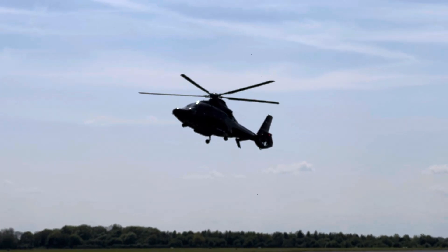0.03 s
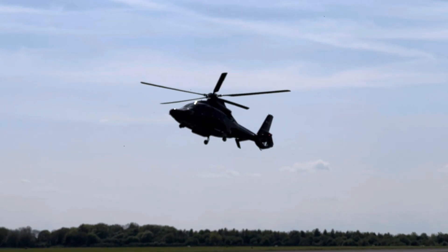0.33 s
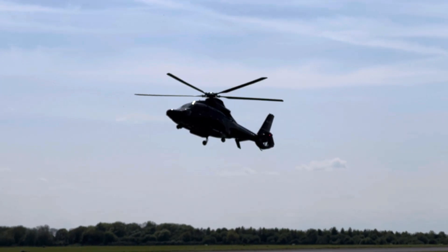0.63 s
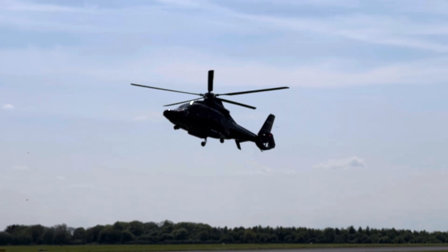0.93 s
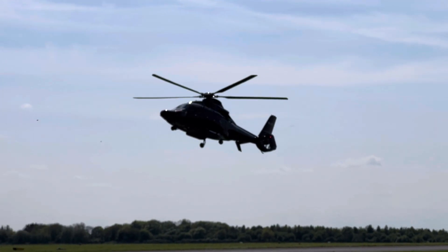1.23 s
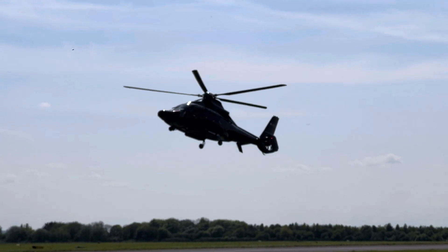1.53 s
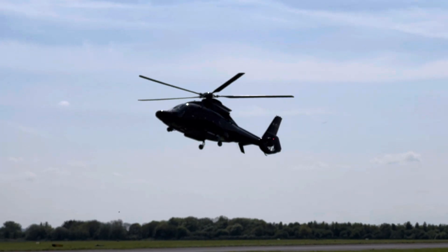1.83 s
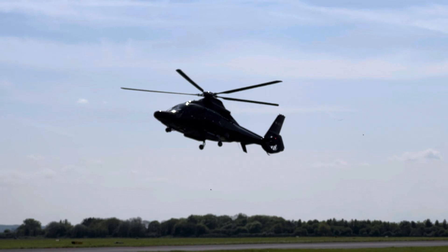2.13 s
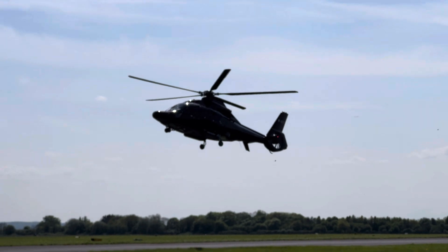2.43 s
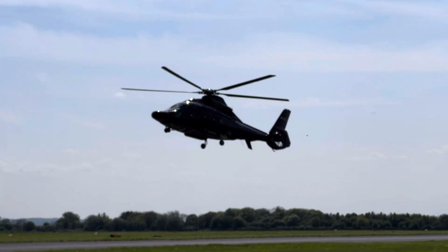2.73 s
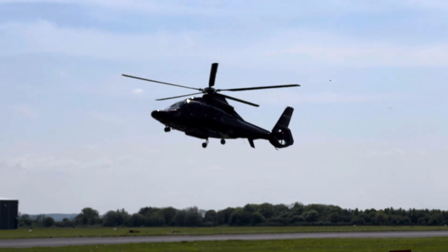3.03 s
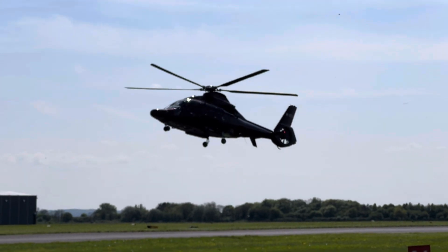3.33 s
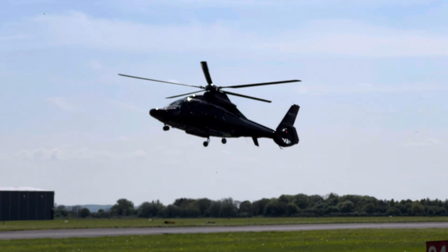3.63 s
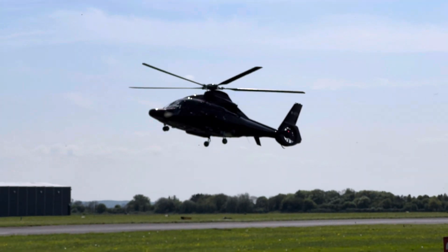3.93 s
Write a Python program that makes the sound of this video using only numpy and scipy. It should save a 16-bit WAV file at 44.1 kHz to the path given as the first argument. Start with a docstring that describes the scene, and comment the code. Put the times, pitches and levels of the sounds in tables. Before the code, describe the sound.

Fast rotor thudding and sharp slaps from a low helicopter, with a thin turbine whine.

```python
"""A fast, low thudding with sharp slaps: a helicopter flies low and slowly past over an open airfield.
Each passing blade pushes out a thump, tears the air with a swish and slaps as it cuts the wake
(the swirling air) of the blade before. Under them the downwash and exhaust roar,
the tail fan hums in its duct and the turbines whine."""
import sys
import numpy as np
from scipy import signal
from scipy.fft import rfft, irfft
from scipy.io import wavfile
from scipy.ndimage import uniform_filter1d

SR = 44100
rng = np.random.default_rng(int(sys.argv[2]) if len(sys.argv) > 2 else 0)


def dump_mix(stems):
    """Bounce the given channels to the path in sys.argv[1] as a 16-bit WAV at rate SR."""
    frames = np.atleast_2d(stems).T  # one column per channel
    limited = np.clip(frames, -1, 1)  # hard clip at full scale
    pcm = np.round(limited * 32767).astype(np.int16)
    wavfile.write(sys.argv[1], SR, pcm)


N = 176400
T = np.arange(N) / SR
FREQS = np.arange(N // 2 + 1) * SR / N

# how the rushing air swells and fades, before each layer's own offset: t/s, bass/dB, middle/dB, treble/dB
AIR_LEVELS = [(0, -25.5, -22.5, -25), (.4, -30.5, -21, -25), (.62, -24.5, -19.5, -25.5),
              (.85, -29.5, -22.5, -22.5), (1.2, -29, -22.5, -26), (1.6, -30.5, -21, -25.5),
              (1.9, -28, -24, -26.5), (2.15, -28, -22.5, -25.5), (2.55, -31.5, -22.5, -26.5),
              (3.1, -27, -21.5, -23.5), (3.28, -28.5, -23, -25), (3.45, -32, -21, -23),
              (3.65, -30.5, -26, -22), (3.85, -24, -27.5, -23), (4, -23.5, -23, -24)]
# the hollow tone colour of a blade slap: f/Hz, level/dB
SLAP_SPECTRUM = [(100, -22.5), (300, -22), (420, -7.5), (520, -2), (700, -12.5), (1000, -17.5), (2000, -24),
                 (5000, -46), (12000, -61)]


def undb(db):
    """Turn decibels into a factor to multiply by."""
    return 10 ** (np.asarray(db) / 20)


def unit(x):
    """Scale a signal to an average strength (rms) of 1."""
    return x / np.sqrt(np.mean(x ** 2))


def curve(rows, column=1):
    """One column of a table, joined by straight lines in time."""
    rows = np.array(rows)
    return np.interp(T, rows[:, 0], rows[:, column])


def wander(per_second):
    """A smooth random wobble of size about 1."""
    hold = int(SR / per_second)
    steps = rng.standard_normal(1000)[np.arange(N) // hold]
    return unit(uniform_filter1d(uniform_filter1d(steps, hold), hold))


def gains(points):
    """The gain at every frequency, from rows of f/Hz, level/dB."""
    hz, db = np.array(points).T
    return undb(np.interp(np.log(FREQS + 1), np.log(hz), db))


def colour(x, points, causal=False):
    """Give a sound a tone colour; a causal filter rings only after each click, never before."""
    response = gains(points)
    if causal:
        cepstrum = irfft(np.log(response))
        response = np.exp(rfft(2 * cepstrum * (np.arange(N) < N // 2)))
    return irfft(rfft(x) * response)


def band_noise(hz, width_hz):
    """Noise gathered around one pitch."""
    return unit(irfft(rfft(rng.standard_normal(N)) / (1 + ((FREQS - hz) / width_hz) ** 2)))


def clicks(times, sizes):
    """One click at each time."""
    at = (times * SR).astype(int)
    inside = (at >= 0) & (at < N)
    return np.bincount(at[inside], sizes[inside], N)


def uneven_clicks(times, jitter_s, spread_db):
    """Clicks that each come a little early or late, loud or soft."""
    size, late = rng.standard_normal((len(times), 2)).T
    return clicks(times + jitter_s * late, undb(spread_db * size))


def ring(x, shape):
    """Start a copy of the shape at every click in x."""
    return signal.fftconvolve(x, shape)[:N]


def burst(rise_s, decay_s):
    """A loudness shape that rises fast and dies away."""
    return np.minimum(T / rise_s, 1) * np.exp(-T / decay_s)


def roar():
    """Downwash and exhaust: churning air whose bass, middle and treble flicker."""
    # tone colour: f/Hz, level/dB
    tone = [(25, -33), (60, -9.5), (110, 3.5), (190, 3), (320, -4), (400, -7.5), (490, -2.5), (620, 0),
            (800, -5), (1000, -10.5), (1250, -4), (1750, -13.5), (2000, -7.5), (2700, -14), (4000, -22.5),
            (4900, -24.5), (5600, -28.5), (6700, -25.5), (8000, -31.5), (9200, -25.5), (10400, -35.5),
            (11000, -22.5), (11600, -99), (12000, -88)]
    flicker_db, flicker_rate, offsets_db = 1.44, 22, (.5, -1, -3)
    spectrum = rfft(colour(rng.standard_normal(N), tone))
    band_of = np.searchsorted([340, 1100], FREQS)  # 0 bass, 1 middle, 2 treble
    shared, out = wander(flicker_rate), 0
    for k, offset in enumerate(offsets_db):
        band = unit(irfft(spectrum * (band_of == k)))
        flicker = flicker_db * (shared + wander(flicker_rate)) / 2
        out += band * undb(curve(AIR_LEVELS, k + 1) + offset + flicker)
    return out


def small_eddies():
    """Brief, uneven rasps as the blades meet small swirls of air."""
    # noise bands: centre f/Hz, level/dB against the treble of AIR_LEVELS
    bands = [(1100, -14.5), (1600, -15), (2300, -17), (3400, -17.5), (4600, -19.5), (6600, -25.5)]
    rasps = 0
    for hz, db in bands:
        rasps += undb(db) * unit(band_noise(hz, width_hz=.14 * hz) * undb(3.5 * wander(110)))
    return rasps * undb(curve(AIR_LEVELS, 3))


def large_eddies():
    """Big swirls pass through the rotor, each a smooth swell of rasping air."""
    # swells: middle t/s, length/s, centre f/Hz, width/Hz, level/dB
    swells = [(0.654, .02, 4600, 1200, -32.5), (.88, 0.032, 4000, 1200, -32.5),
              (1.54, 0.019, 4500, 2000, -30.5), (1.648, .02, 4200, 1800, -36),
              (1.715, 0.043, 3600, 1500, -32), (2.135, .02, 2270, 300, -27), (2.147, .02, 3500, 300, -25.5),
              (3.41, 0.093, 1200, 600, -23), (3.49, 0.095, 2300, 900, -25.5),
              (3.652, 0.042, 1500, 900, -21), (3.834, 0.055, 1680, 800, -23.5)]
    out = 0
    for middle, length, hz, width_hz, db in swells:
        swell = np.cos(np.pi * np.clip((T - middle) / length, -.5, .5))
        out += undb(db) * swell * band_noise(hz, width_hz)
    return out


def turbines():
    """The engines: a high, fluttering whistle, with the compressor's hiss pitched below it."""
    # whistle pitch: t/s, f/Hz
    pitch = [(0, 10620), (.6, 10660), (1.3, 10655), (2, 10595), (2.5, 10590), (3.2, 10560), (3.6, 10580),
             (4, 10545)]
    # loudness: t/s, whistle/dB, hiss/dB
    levels = [(0, -45.5, -53), (.6, -47, -50), (1.05, -39.5, -61), (1.3, -45, -50.5), (2, -37.5, -45.5),
              (2.5, -41, -48), (3.2, -32.5, -40), (3.6, -38.5, -43), (4, -34, -42)]
    flutter_rate, fuzz_hz = 45, 70
    hz = curve(pitch) * (1 + .0016 * wander(flutter_rate))
    phase = 2 * np.pi * np.cumsum(hz) / SR
    # a narrow band of noise that follows the whistle
    fuzz = band_noise(0, fuzz_hz) * np.sin(phase) + band_noise(0, fuzz_hz) * np.cos(phase)
    whistle = unit(np.sin(phase) * undb(4.5 * wander(flutter_rate))) + undb(-4) * fuzz
    hiss = band_noise(hz=8940, width_hz=290) * undb(1.8 * wander(17))
    return whistle * undb(curve(levels)) + hiss * undb(curve(levels, 2))


def tail_fan(blade_rate):
    """The ducted tail fan and its gears hum in step with the rotor; one clear whine beams forward."""
    # change in the hum as the duct turns past: t/s, level/dB
    hum_level = [(0, 0.5), (.8, 0), (1.5, -7), (2.5, -1), (4, 0.5)]
    # the forward whine: t/s, level/dB
    whine_level = [(0, -31), (.45, -33), (.6, -28.5), (.85, -29.5), (1, -36), (1.18, -33), (1.4, -40),
                   (4, -42)]
    turns_per_pass, whine_multiple = 2.093, 14
    multiples, levels_db = (6, 8, 9.2, 12, 18.7), (-42, -33, -37, -37, -43)
    turns = np.cumsum(blade_rate * turns_per_pass * (1 + .0028 * wander(12))) / SR
    phase, hum = 2 * np.pi * turns, 0
    for multiple, db in zip(multiples, levels_db):
        hum += undb(db) * unit(np.sin(multiple * phase) * undb(4 * wander(7)))
    whine = unit(np.sin(whine_multiple * phase) * undb(4.5 * wander(15)))
    return hum * undb(curve(hum_level)) + whine * undb(curve(whine_level))


def rotor_drone(blade_count):
    """Overtones of the blade beat, wavering in timing and strength on their way through the wake."""
    # overtones: multiple of the blade rate, relative level/dB
    overtones = [(4, -4), (7, -3), (8, -17), (9, -7), (10, -15.5), (14, -10.5), (15, -6)]
    # all those overtones together: t/s, level/dB
    drone_level = [(0, -43), (.6, -30.5), (.9, -42), (1.15, -29), (1.4, -41), (2, -42), (2.6, -26.5),
                   (2.8, -31.5), (3.2, -31), (3.35, -29), (3.6, -25), (3.75, -42), (4, -43)]
    # one steadier overtone, the hum: t/s, level/dB
    hum_level = [(0, -36), (.6, -31), (.9, -42), (1.15, -33), (1.4, -44), (2.3, -37), (2.6, -28.5),
                 (2.9, -33), (3.2, -32), (3.33, -25.5), (3.45, -28), (3.58, -23.5), (3.72, -36), (4, -40)]
    drift_rate, hum_multiple = 17, 6
    tones = 0
    for multiple, db in overtones:
        cycles = multiple * blade_count + .14 * wander(drift_rate)
        tones += undb(db + 3.5 * wander(drift_rate)) * np.sin(2 * np.pi * cycles)
    cycles = hum_multiple * blade_count + .05 * wander(drift_rate)
    hum = np.sin(2 * np.pi * cycles) * undb(1.5 * wander(drift_rate))
    return np.sqrt(2) * (tones * undb(curve(drone_level)) + hum * undb(curve(hum_level)))


def swish(passes):
    """Air tears over the forward-moving blade: a puff of noise on each pass."""
    # loudness: t/s, level/dB
    level = [(0, -26.5), (.3, -23), (.65, -31), (1, -31.5), (1.55, -27), (1.8, -29), (2.2, -32), (2.6, -35),
             (3.2, -31), (3.6, -27.5), (3.82, -29), (4, -42)]
    # tone colour: f/Hz, level/dB
    tone = [(80, 2), (180, -11.5), (320, -2.5), (520, 1), (850, -4), (1300, -1.5), (1700, -6.5),
            (2100, -4.5), (3200, -11), (5500, -22.5), (7200, -22.5), (11000, -44)]
    starts = uneven_clicks(passes - .001, jitter_s=.0015, spread_db=2.2)
    puffs = ring(starts, burst(rise_s=.0035, decay_s=.0085)) * rng.standard_normal(N)
    return unit(colour(puffs, tone, causal=True)) * undb(curve(level))


def light_slaps(passes):
    """Every blade grazes the wake: a light slap with a short, noisy tail."""
    # loudness: t/s, level/dB
    level = [(0, -26), (.44, -29.5), (.58, -23), (.74, -20), (.95, -32), (1.18, -27.5), (1.45, -31.5),
             (2.1, -27.5), (2.65, -32.5), (3.08, -25.5), (3.25, -31), (3.5, -31), (3.76, -27), (3.95, -34)]
    tail_s, tail_db = .0066, -.5
    cracks = uneven_clicks(passes + .002046, jitter_s=.001, spread_db=1.5)
    tails = ring(cracks, np.exp(-T / tail_s)) * rng.standard_normal(N)
    slaps = undb(tail_db) * unit(tails) - unit(cracks)
    return unit(colour(slaps, SLAP_SPECTRUM, causal=True)) * undb(curve(level))


def knock(tone, rise_s=.0006):
    """The short pressure wave, peak 1, of a blade hitting a vortex (a tight whirl of air)."""
    wave = colour(1. * (T == 0), tone, causal=True)[:N // 100]
    wave *= np.minimum(T[:len(wave)] / rise_s, 1)
    return -wave / np.max(np.abs(wave))


def vortex_knocks(passes):
    """Blade after blade meets the same drifting vortex: knocks that swell, slide in time and fade."""
    # runs of knocks: start t/s, end t/s, first lag behind the pass/ms, last lag/ms, peak level/dB
    runs = [(.72, 0.926, 0.9, -3, -9), (1.05, 1.4, 4, 4.5, -11), (2.15, 2.47, 1, 0.5, -10.5),
            (2.44, 2.816, -0.1, -3.5, -13), (2.683, 2.88, 0, 3, -14), (2.82, 3.2, 4, -2.5, -9.5),
            (3.12, 3.32, -2.5, -3, -19), (3.244, 3.622, 9.5, 3.5, -8.5), (3.55, 3.843, 9, 5, -14),
            (3.64, 3.929, 4.5, -.5, -10.5)]
    # tone colour: f/Hz, level/dB
    tone = [(100, -20), (300, -13), (480, -1), (680, 0), (1000, -8), (2000, -21), (5000, -42), (12000, -65)]
    hits = 0
    for start, end, first_lag_ms, last_lag_ms, db in runs:
        progress = np.clip((passes - start) / (end - start), 0, 1)
        lag_s = (first_lag_ms + (last_lag_ms - first_lag_ms) * progress) / 1000
        swell = np.sqrt(4 * progress * (1 - progress))
        sizes = swell * undb(db + 1.2 * rng.standard_normal(len(passes)))
        hits += clicks(passes + lag_s, sizes)
    return ring(hits, knock(tone))


def hard_slaps():
    """Close hits on a vortex: a hollow knock and a bright crack, doubled as the blade leaves its core."""
    # hits: t/s, knock level/dB, crack level/dB
    hits = [(.027, -12, -10), (0.062, -21, -12), (.095, -10, -22), (.128, -11, -21), (0.1631, -13, -15),
            (.199, -16, -15.5), (0.4402, -18, -14), (.474, -11, -24), (.508, -3, -14.5), (0.5422, -8, -13),
            (.578, -3, -18), (.6105, -13, -14), (.644, -7, -15), (.679, -2.5, -17), (1.442, -16, -22),
            (1.477, -10.5, -16), (1.581, -10.5, -16), (1.615, -17, -16), (1.993, -17, -23),
            (2.198, -19, -19), (2.443, -9.5, -17), (3.066, -6, -26), (3.722, -9, -24), (3.756, -10, -20),
            (3.822, -16, -18)]
    # tone colour of the crack: f/Hz, level/dB
    crack_tone = [(200, -14), (700, -2), (1300, 0), (2400, -4), (4000, -13), (7000, -25), (11000, -42)]
    gap_s, second_db = .00392, -6
    times, knock_db, crack_db = np.array(hits).T
    again = times + gap_s * (1 + .1 * rng.standard_normal(len(times)))

    def doubled(db):
        return clicks(times, undb(db)) + clicks(again, undb(db + second_db))

    knocks = ring(doubled(knock_db), knock(SLAP_SPECTRUM))
    bursts = ring(doubled(crack_db), burst(rise_s=.001, decay_s=.0021))
    return knocks + bursts * unit(colour(rng.standard_normal(N), crack_tone))


def thump(passes):
    """The air pressure dips under each blade; the tone changes with the listener's angle to the rotor."""
    # loudness, before the offset: t/s, level/dB
    level = [(0, -15), (.2, -19), (.5, -23.5), (.63, -21.5), (.8, -28), (.95, -32), (1.4, -27),
             (1.7, -27.5), (1.9, -25), (2.25, -26.5), (2.55, -23.5), (2.95, -29.5), (3.15, -25.5),
             (3.3, -30), (3.5, -24.5), (3.7, -30.5), (4, -26)]
    # tone colour as the helicopter heads in: f/Hz, level/dB
    ahead = [(15, -38), (29, -22), (58, -3.5), (87, 1), (116, 1.5), (145, -6), (175, -9), (205, -6),
             (240, -35), (320, -43), (700, -71)]
    # tone colour once it draws alongside: f/Hz, level/dB
    alongside = [(15, -35), (29, -16), (58, -3.5), (87, 0), (116, -5), (145, -25), (175, -17.5), (205, -10),
                 (240, -42), (320, -41), (700, -114)]
    lag_s, blend_span_s, offset_db = .0113, (.25, .76), -1
    dips = -uneven_clicks(passes + lag_s, jitter_s=.00024, spread_db=1.7)
    blend = np.interp(T, blend_span_s, (0, 1))
    beat = (1 - blend) * unit(colour(dips, ahead)) + blend * unit(colour(dips, alongside))
    return beat * undb(curve(level) + offset_db)


def over_ground(x):
    """The grass adds a weak echo that lags more as the helicopter nears."""
    lag_s = np.linspace(.002106, .00266, N)
    return x + .089 * np.interp(T - lag_s, T, x)


def microphones(x):
    """Two close microphones hear the sound slightly out of step, then faint echoes off the ground."""
    # how far the left side is ahead: f/Hz, phase/rad
    left_lead = [(20, 0), (300, .05), (950, .4), (1550, -.7), (2200, 0), (2900, .7), (4700, 0), (8500, 0),
                 (9100, -1.6), (10000, -3.14), (10800, -4), (11400, -6)]
    # how much louder the left side is: f/Hz, level/dB
    balance = [(60, 0), (190, -0.59), (350, -.9), (620, -0.5), (1120, 1), (2000, -0.81), (3600, -.3),
               (6400, 0.44)]
    # tone colour of the scattered echoes: f/Hz, level/dB
    echo_tone = [(30, -33), (90, -33), (180, -20.5), (350, -15), (700, -10.5), (1400, -11), (2800, -15.5),
                 (4000, -10), (5500, -48), (11000, -57)]
    delay_s, decay_s = .012, .03
    sides = np.array([[1], [-1]])  # left, right
    tail = rng.standard_normal(N) * np.exp(-T / decay_s) * (T > delay_s)
    tail /= np.sqrt(np.sum(tail ** 2))
    echoes = colour(ring(x, tail), echo_tone)
    lead = np.interp(FREQS, *np.array(left_lead).T)
    response = np.exp(.5 * sides * (1j * lead + np.log(gains(balance))))
    return irfft(rfft(x) * response) + sides * echoes


def scene():
    """The whole helicopter in stereo; one rotor speed sets the beat and the pitch of the tail fan."""
    # blade passes per second: t/s, f/Hz
    rotor_speed = [(0, 29.1), (.35, 29.1), (.85, 28.85), (1.4, 29.1), (2.3, 28.95), (4, 28.85)]
    first_pass_s = .026
    blade_rate = curve(rotor_speed)
    blade_count = np.cumsum(blade_rate) / SR - first_pass_s * blade_rate[0]
    passes = np.interp(np.arange(int(blade_count[-1]) + 1), blade_count, T)  # when each blade goes by
    air = over_ground(swish(passes) + roar() + small_eddies() + large_eddies())
    slaps = light_slaps(passes) + vortex_knocks(passes) + hard_slaps()
    rotor = thump(passes) + rotor_drone(blade_count) + slaps
    return microphones(rotor + air + tail_fan(blade_rate) + turbines())


def record(dry):
    """Round off the loudest peaks and cut the highest treble."""
    ceiling, top_hz = .92, 11600
    rounded = dry / (1 + (dry / ceiling) ** 6) ** (1 / 6)
    return signal.sosfilt(signal.ellip(8, .2, 80, top_hz, fs=SR, output="sos"), rounded)


dry = scene()
out = record(dry)
dump_mix(out)
```